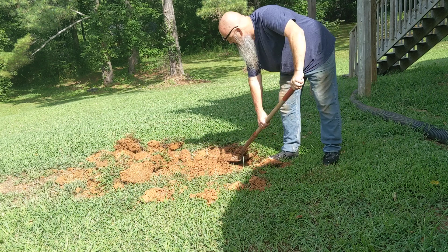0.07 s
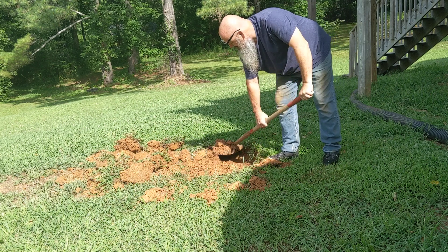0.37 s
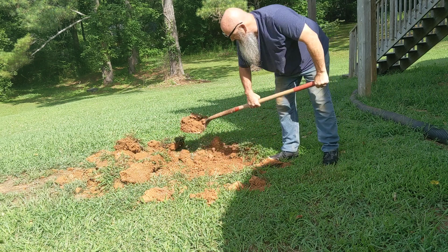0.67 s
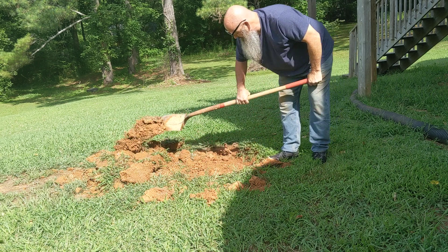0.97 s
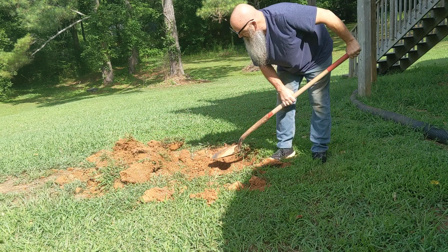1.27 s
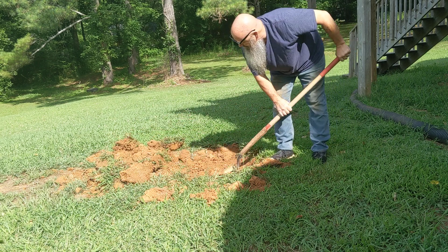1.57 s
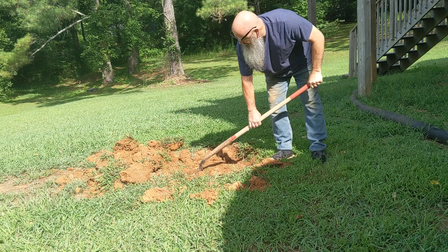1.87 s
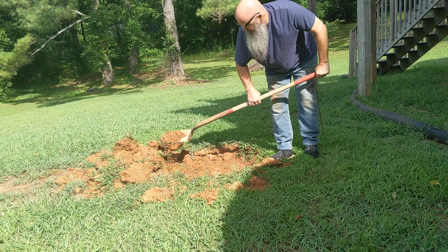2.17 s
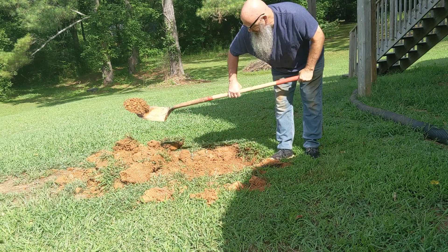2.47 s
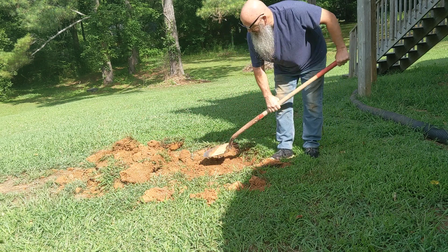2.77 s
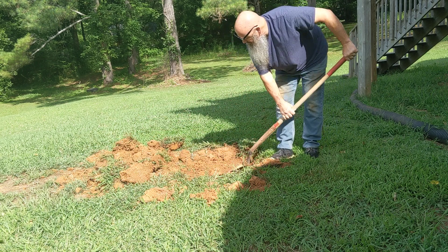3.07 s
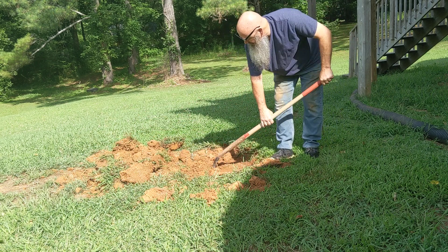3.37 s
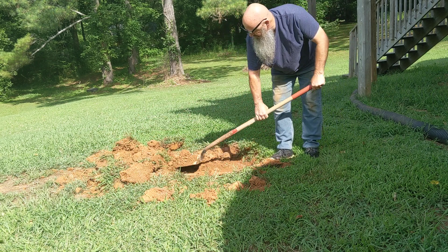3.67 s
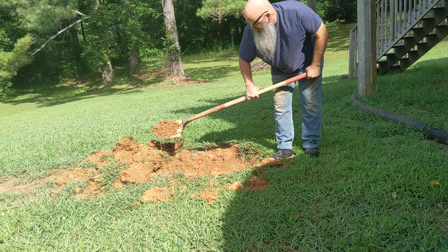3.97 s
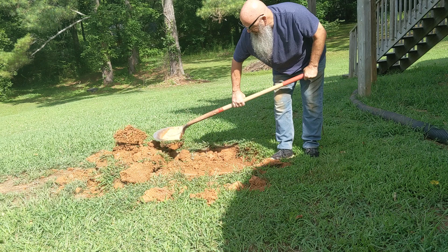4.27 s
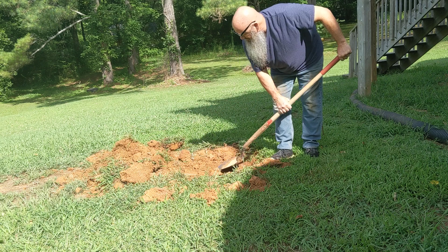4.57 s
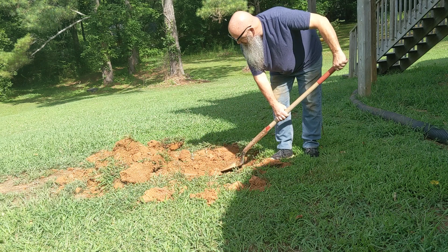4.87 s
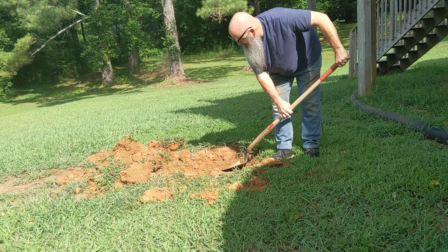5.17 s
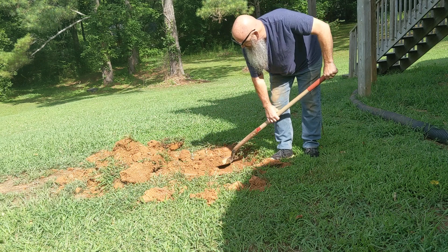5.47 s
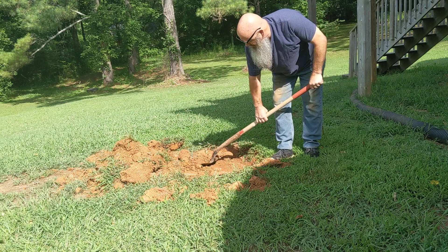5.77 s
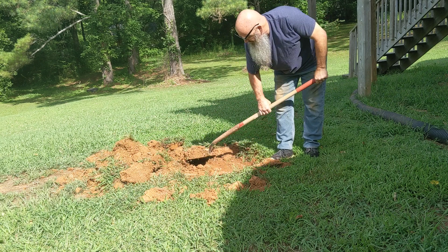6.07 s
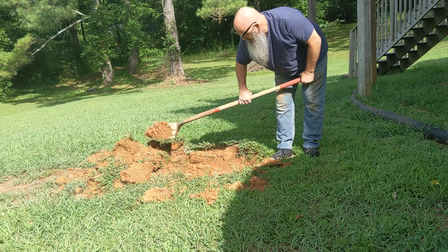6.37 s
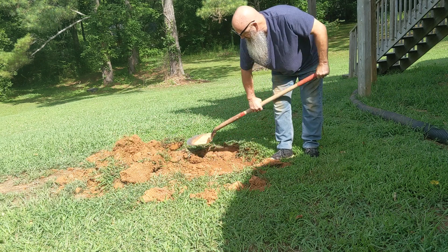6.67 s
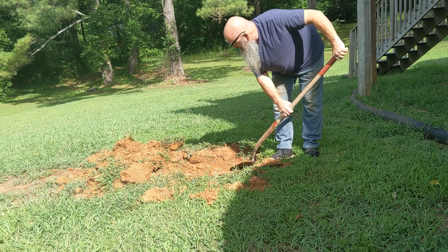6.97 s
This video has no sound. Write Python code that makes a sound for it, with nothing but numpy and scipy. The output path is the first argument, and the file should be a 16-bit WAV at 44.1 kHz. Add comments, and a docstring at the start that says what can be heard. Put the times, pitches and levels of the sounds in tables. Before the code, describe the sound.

A steel shovel digs into clay soil a few metres away on a lawn, with a slight scatter of sound off a nearby wall. It opens with a strong crunching scrape and three quick thuds. A light knock and ping come at about 1 second, then a swelling scrape with dull knocks from 1.6 to 1.9. A longer gritty stroke runs from 3.1 to 3.6, catching a stone. Cicadas hiss softly from the start and stop at about 3.7 seconds. At 4.7 the blade knocks and rings lightly, then hits a stone sharply at 4.9, the loudest moment. Scraping with several stony clicks follows from 5.3 to 5.8. Faint birds call between 5.9 and 7 seconds, and a last short scrape and knock come at about 7.2. A quiet low rumble and distant motor hum lie underneath throughout.

```python
"""A steel shovel scrapes and thuds into clay soil, a few metres away on a summer lawn beside a house.
Each stroke drags the blade through clods and grit, which set it ringing; it catches on stones
and strikes one hard. Ground and wall scatter the sound. Behind it, cicadas hiss in the trees
and stop halfway; faint birds follow, over a low outdoor rumble and the hum of a distant motor."""
import sys
import numpy as np
from scipy import signal
from scipy.fft import rfft, irfft, next_fast_len
from scipy.io import wavfile

SR = 44100
rng = np.random.default_rng(int(sys.argv[2]) if len(sys.argv) > 2 else 0)


def put_to_file(sound):
    """Save the sound as 16-bit audio at rate SR, in the file named by the first command-line argument."""
    columns = np.atleast_2d(sound).T  # one column per channel
    safe = np.clip(columns, -1, 1)
    whole_steps = np.round(safe * 32767)
    wavfile.write(sys.argv[1], SR, whole_steps.astype(np.int16))


N = 317961
TIME = np.arange(N) / SR
RING_TIME = np.arange(SR // 3) / SR


def from_db(db):
    """Decibels to gain."""
    return 10 ** (np.asarray(db) / 20)


def unit_rms(x):
    """Scale to rms 1."""
    return x / np.sqrt(np.mean(x ** 2) + 1e-20)


def pan(db):
    """Gains of the two ears for a left-minus-right level."""
    return from_db(db * np.array([[.5], [-.5]]))


def at_hz(points, hz):
    """Read a frequency curve on a log axis."""
    corners_hz, values = np.transpose(points)
    return np.interp(np.log(hz + 1e-3), np.log(corners_hz), values)


def band(x, low_hz, high_hz, order=2):
    """Causal band-pass."""
    sos = signal.butter(order, [low_hz, min(high_hz, .48 * SR)], "band", fs=SR, output="sos")
    return signal.sosfilt(sos, x)


def resonance(x, hz, width_hz):
    """One ringing mode, gain 1 at its peak."""
    return signal.lfilter(*signal.iirpeak(hz, hz / width_hz, fs=SR), x)


def sine(hz):
    """An oscillator that follows a pitch curve."""
    return np.sin(2 * np.pi * np.cumsum(hz) / SR)


def drift(per_s):
    """Smooth random modulation, rms 1."""
    knots = rng.standard_normal(8192)
    return unit_rms(np.interp(TIME * per_s, np.arange(len(knots)), knots))


def grains(per_s, spread_db):
    """Random clicks of very uneven size, rms 1."""
    sizes = from_db(spread_db * np.minimum(rng.exponential(1, N), 4)) * rng.choice([-1, 1], N)
    return unit_rms(sizes * (rng.random(N) < per_s / SR))


def rough_tones(notes):
    """For each note, a swell of noise feeds one resonance, which then rings out."""
    out = np.zeros(N + len(RING_TIME))
    for start_s, length_s, hz, width_hz, level_db in notes:
        swell = np.sqrt(np.sin(np.pi * np.minimum(RING_TIME / length_s, 1)).clip(0))
        rub = swell * rng.standard_normal(len(RING_TIME))
        tone = resonance(resonance(rub, hz, width_hz), hz, 4 * width_hz)
        at = round(start_s * SR)
        out[at:at + len(tone)] += from_db(level_db) * np.sqrt(length_s * SR) * tone / np.linalg.norm(tone)
    return out[:N]


# how alike the ambience is at the two ears: (frequency [Hz], correlation [0..1])
EAR_LIKENESS = [(50, 1), (250, 0.7), (1000, 0.41), (2500, 0.055), (4500, 0), (16000, 0.11)]
def outdoor_noise(spectrum):
    """Noise from all around, centred in the bass and wide in the treble; the mid has rms 1."""
    size = next_fast_len(N)
    mid, side = rfft(rng.standard_normal((2, size)))
    hz = np.fft.rfftfreq(size, 1 / SR)
    alike = at_hz(EAR_LIKENESS, hz)
    ears = np.sqrt(1 + alike) * mid + np.sqrt(1 - alike) * side * [[1], [-1]]
    noise = irfft(from_db(at_hz(spectrum, hz)) * ears)[:, :N]
    return noise / np.std(noise.mean(0))


# tone of the outdoor bed: (frequency [Hz], relative density [dB])
AIR_SPECTRUM = [(20, -2.5), (45, -1.5), (70, -2), (115, -4), (160, -9), (220, -14.5), (300, -25),
                (800, -21), (1300, -23.5), (2100, -27.5), (3200, -23), (4300, -24), (5400, -20.5),
                (6500, -29), (8200, -36.5), (16000, -39.5)]
def outdoor_air(level_db=-56.4):
    """A steady bed of low rumble and far insect hiss."""
    return from_db(level_db) * outdoor_noise(AIR_SPECTRUM) * pan(-1)


# partials of the motor: (frequency [Hz], level before trim [dB])
MOTOR_PARTIALS = [(48, -65), (118, -65.5)]
def motor_hum(trim_db=-3, waver_db=3.5, wander_hz=1.497):
    """A distant motor hums, wavering in level and pitch."""
    hum = sum(from_db(level_db + waver_db * drift(5)) * sine(hz + wander_hz * drift(9.8))
              for hz, level_db in MOTOR_PARTIALS)
    return from_db(trim_db) * np.sqrt(2) * hum * pan(-1)


# tone of the cicada chorus: (frequency [Hz], relative density [dB])
CICADA_SPECTRUM = [(2500, -23), (3500, -12), (4400, -4.5), (5500, -4), (6300, -6), (7200, -3.5),
                   (8200, -12.5), (9300, -11), (10500, -27), (11800, -16.5), (13000, -28), (16000, -24.5)]
def cicadas(start_db=-56.5, far_db=-75, sag_db_per_s=0.8, stop_s=3.7, stop_db_per_s=179, pulse_hz=49):
    """Cicadas hiss with a faint fast pulse, tire slowly, then stop; a few go on far away."""
    pulse = 1 + 0.088 * sine(pulse_hz + 2 * drift(5.15))
    chorus_db = start_db - sag_db_per_s * TIME - stop_db_per_s * np.maximum(TIME - stop_s, 0)
    shimmer_db = 0.7 * drift(36.4)
    level = from_db(np.maximum(chorus_db, far_db) + shimmer_db)
    return level * pulse * outdoor_noise(CICADA_SPECTRUM) * pan(-1)


# distant calls: (time [s], length [s], pitch [Hz], bandwidth [Hz], level [dB])
FAR_BIRD_CALLS = [(5.88, 0.17, 3100, 250, -66.5), (6.67, .25, 4520, 120, -63), (6.72, 0.4, 3720, 1260, -64)]
def far_birds():
    """Calls blurred by the trees reach each ear differently."""
    return np.array([rough_tones(FAR_BIRD_CALLS) for _ in range(2)])


def small_bird(start_s=6.438, from_hz=5400, to_hz=7250, glide_s=.012, rasp_hz=420,
               level_db=-61, attack_s=.016, fade_db_per_s=61):
    """A thin lisp slurs up to a held, buzzy pitch and fades."""
    since = np.maximum(TIME - start_s, 0)
    pitch = to_hz + (from_hz - to_hz) * np.exp(-since / glide_s) + rasp_hz * drift(900)
    envelope = np.minimum(since / attack_s, 1) * from_db(level_db - fade_db_per_s * since)
    return envelope * sine(pitch)


# shaft and blade modes, damped by the soil: (frequency [Hz], bandwidth [Hz], relative level [dB])
SHOVEL_MODES = [(227.5, 28, 2), (313, 12, 2.5), (390, 64, -3.5), (557.3, 12.7, 6), (631, 27, -8.5),
                (720, 47, -3.5), (806, 39, 7.5), (1135, 170, 1.5), (1370, 28, -3), (1555, 110, -1.5),
                (1700, 18, 6.5), (2000, 22, -2), (2260, 180, 0.5), (2470, 140, -5), (2860, 29, -2),
                (3100, 170, 6), (4150, 680, -1.5), (5200, 590, -1.5), (5710, 750, -2.5), (7430, 660, -1.5),
                (9280, 850, 4), (11480, 190, 3), (13300, 690, -9)]
# scatter off ground and wall: (frequency [Hz], level against the direct sound [dB])
WALL_SCATTER = [(150, -18), (800, -16), (1500, -13), (3200, -4), (4500, 2), (16000, 4)]
# the shovel's place in the stereo image: (frequency [Hz], left minus right [dB])
SHOVEL_PAN = [(200, -2.5), (700, -3.5), (1500, 2), (2500, -4.5), (3400, 6), (5000, -9.5), (6500, -5.5),
              (10000, -9), (13000, -3.5), (16000, -5)]
# phase between the ears: (frequency [Hz], left lead [rad])
SHOVEL_PHASE = [(400, 0.46), (1500, 0.43), (3000, -1.4), (4000, -1.5), (11000, 0.1), (14000, -7.7)]
def shovel_response(click_db=-13, near_t60_s=.06, far_t60_s=.36, far_db=-10):
    """One grain on the blade at both ears: a click, the modes, then scatter from ground and wall."""
    size = len(RING_TIME)
    ring = from_db(click_db) * (RING_TIME == 0)
    for hz, width_hz, level_db in SHOVEL_MODES:
        decay = np.pi * width_hz
        mode = np.exp(-decay * RING_TIME) * np.cos(2 * np.pi * hz * RING_TIME)
        ring += from_db(level_db) * 2 * decay / SR * mode
    ring = np.roll(ring, 24)   # a short delay leaves room for one ear to lead
    bins_hz = np.fft.rfftfreq(size, 1 / SR)
    tail = from_db(-60 * RING_TIME / near_t60_s) + from_db(far_db - 60 * RING_TIME / far_t60_s)
    scatter_gain = from_db(at_hz(WALL_SCATTER, bins_hz))
    wash = irfft(rfft(rng.standard_normal((2, size))) * scatter_gain, size)
    scatter = wash * tail / np.linalg.norm(tail)
    paths = (1 + rfft(scatter)) / np.hypot(1, scatter_gain)
    ear_gain = pan(at_hz(SHOVEL_PAN, bins_hz))
    ear_phase = np.exp(1j * at_hz(SHOVEL_PHASE, bins_hz) * [[.5], [-.5]])
    fade_out = np.minimum(10 * (1 - RING_TIME / RING_TIME[-1]), 1) ** 2
    return fade_out * irfft(rfft(ring) * paths * ear_gain * ear_phase, size)


def play_through(force, response):
    """Drive a response, scaled so that its mid has unit energy."""
    response = response / np.linalg.norm(response.mean(0))
    return signal.oaconvolve(np.atleast_2d(force), response, axes=1)[:, :N]


def widen(mid, side, above_hz=3500, side_db=-2):
    """Grains land all over the blade, so its treble differs between the ears."""
    return mid + from_db(side_db) * band(side, above_hz, SR) * [[1], [-1]]


# light rings of the steel: (time [s], level [dB])
BLADE_PINGS = [(1.062, -53), (4.055, -60), (4.765, -49)]
def blade_pings(length_s=.0064, hz=1696, width_hz=32):
    """The free blade pings in one narrow mode."""
    return rough_tones([(start_s, length_s, hz, width_hz, db) for start_s, db in BLADE_PINGS])


# shovel modes under load: (frequency [Hz], bandwidth [Hz], level against the load [dB])
RUBBED_MODES = [(215, 125, -15), (799, 120, -10.5), (1710, 90, -15.5)]
def loaded_ring(load, waver_db=4, ring_out_db_per_s=130):
    """The earth's weight rubs a few modes unevenly; they ring on when the blade comes free."""
    fall_db = ring_out_db_per_s * TIME
    held_db = np.maximum.accumulate(20 * np.log10(load + 1e-9) + fall_db) - fall_db
    out = np.zeros(N)
    for hz, width_hz, level_db in RUBBED_MODES:
        ring = resonance(resonance(rng.standard_normal(N), hz, 4 * width_hz), hz, width_hz)
        out += from_db(held_db + level_db) * unit_rms(ring * from_db(waver_db * drift(22)))
    return out


def push_force(length_s, level_db, swell_db, bite_s=.009, stop_db_per_s=515,
               trickle_db=-15, trickle_db_per_s=113):
    """One push bites, swells or eases, and stops quickly; loose crumbs trickle on."""
    since = np.arange(SR) / SR
    after = np.maximum(since - length_s, 0)
    attack = np.minimum(since / bite_s, 1)
    body = from_db(level_db + swell_db * np.minimum(since / length_s, 1))
    release = np.maximum(from_db(-stop_db_per_s * after), from_db(trickle_db - trickle_db_per_s * after))
    return attack * body * release


# pushes through the soil: (time [s], length [s], force [dB], swell over the push [dB],
# clod offset [dB], grit offset [dB], singing mode [Hz])
BLADE_PUSHES = [(0.062, 0.11, -38.5, -2.5, -0.5, 3.5, 804), (0.16, 0.034, -34, -4, 3.5, 0.5, 400),
                (0.206, 0.027, -41, 0, -2, -9, 2470), (1.584, 0.14, -50, 9.5, -3, 1, 730),
                (1.732, 0.12, -36.5, 0, -1.5, -5, 1370), (1.863, 0.043, -51, -6, -8, -8, 1710),
                (3.086, 0.072, -54.5, -6.5, 0, 7, 3100), (3.161, 0.12, -49.5, 7.5, -4, 3, 3100),
                (3.279, 0.25, -45.5, -4.5, -6.5, 0, 213), (3.45, 0.089, -40, -1, -10.5, -1, 1370),
                (3.532, 0.072, -44, -3.5, -3, -1, 2260), (4.825, 0.11, -50.5, -0.5, -6.5, 3, 2860),
                (4.931, 0.052, -39.5, -9.5, -4, -21, 1005), (5.324, 0.14, -48, 1, -2.5, 1, 3140),
                (5.502, 0.053, -47, -6.5, -6, 6.5, 2330), (5.574, 0.094, -47, -4, -4.5, 0, 3070),
                (5.697, 0.054, -48, 0, -0.5, 0.5, 2360), (7.16, 0.094, -47, -7, -5.5, 4, 1370)]
def soil_forces():
    """The pushes add in power to three envelopes: the force on clods, sand and grit."""
    power = np.zeros((3, N + SR))
    for start_s, length_s, level_db, swell_db, clods_db, grit_db, _ in BLADE_PUSHES:
        shares = from_db([[clods_db], [0], [grit_db]])
        at = round(start_s * SR)
        power[:, at:at + SR] += (shares * push_force(length_s, level_db, swell_db)) ** 2
    return np.sqrt(power[:, :N])


def blade_singing(offset_db=-6, q=12):
    """Friction makes one mode sing in each push."""
    return rough_tones([(start_s, length_s, hz, hz / q, level_db + swell_db / 2 + offset_db)
                        for start_s, length_s, level_db, swell_db, _, _, hz in BLADE_PUSHES])


def soil_scrape(response, clod_force, sand_force, grit_force, judder_db=3):
    """Clods pop, sand rasps and grit ticks, juddering as the blade sticks and slips; pebbles crack."""
    judder = unit_rms(from_db(judder_db * drift(170)))
    sand = sand_force * judder * widen(grains(3600, 3.5), grains(3600, 3.5))
    grit = grit_force * judder * widen(grains(5000, 4.5), grains(5000, 4.5))
    pebbles = np.sqrt(sand_force * grit_force) * grains(per_s=70, spread_db=3.4)
    clods = clod_force * judder * grains(1200, 3.5)
    return (from_db(-1.5) * play_through(clods, band(response, 202, 775, order=3))
            + from_db(-1) * play_through(sand, band(response, 1300, 3850))
            + from_db(-4) * play_through(grit, band(response, 3500, 21000))
            + from_db(-6) * play_through(pebbles, response))


def blow(response, start_s, level_db, length_s, mode_hz, boost_db, low_hz, high_hz, q=12):
    """A blow crushes a quick run of grains; the spot it lands on favours one mode."""
    body = band(response, low_hz, high_hz, order=1)
    body = body + from_db(boost_db) * resonance(body, mode_hz, mode_hz / q)
    envelope = (1 - np.exp(-RING_TIME / .0005)) * np.exp(-RING_TIME / length_s)
    crush = widen(*rng.standard_normal((2, len(RING_TIME))))
    hit = signal.fftconvolve(crush * envelope, body, axes=1)
    hit *= from_db(level_db) * np.sqrt(length_s * SR) / np.linalg.norm(hit.mean(0))
    return np.pad(hit, ((0, 0), (round(start_s * SR), N)))[:, :N]


# hits on earth: (time [s], level [dB], brightness [Hz], favoured mode [Hz])
EARTH_THUDS = [(0.073, -34, 3900, 840), (0.172, -28, 910, 395), (0.227, -31.5, 3450, 763),
               (0.971, -46.5, 2200, 1940), (1.591, -53, 3000, 790), (1.737, -36.5, 3000, 750),
               (1.878, -37.5, 2000, 854), (3.353, -43.5, 2000, 830), (4.748, -39.5, 1500, 245),
               (4.936, -36, 990, 248), (5.784, -43, 4960, 730), (7.176, -43, 5000, 1700)]
def earth_thuds(response, length_s=.0099):
    """The blade meets packed earth with a dull knock."""
    return sum(blow(response, start_s, db, length_s, mode_hz, boost_db=13.5, low_hz=166, high_hz=top_hz)
               for start_s, db, top_hz, mode_hz in EARTH_THUDS)


# hits on stone: (time [s], level [dB], crunch decay [s], favoured mode [Hz])
STONE_STRIKES = [(4.9365, -17, .0025, 2980), (4.979, -38, .004, 9400), (5.058, -54, .025, 6800),
                 (5.701, -37, .006, 1700), (3.381, -33, .009, 9400), (5.328, -39, .004, 3000),
                 (5.431, -36, .002, 3100), (5.462, -38, .005, 3200), (5.512, -42.5, .006, 5200),
                 (5.568, -31, .003, 2900), (6.133, -45.5, .002, 3200)]
def stone_strikes(response):
    """The edge catches a stone with a short, bright crunch."""
    return sum(blow(response, start_s, db, length_s, mode_hz, boost_db=10.5, low_hz=450, high_hz=11500)
               for start_s, db, length_s, mode_hz in STONE_STRIKES)


def scene():
    """The shovel up front, the summer lawn behind."""
    response = shovel_response()
    clod_force, sand_force, grit_force = soil_forces()
    scrape = soil_scrape(response, clod_force, sand_force, grit_force)
    hits = earth_thuds(response) + stone_strikes(response)
    ringing = (blade_singing() + blade_pings() + loaded_ring(clod_force)) * pan(-2)
    lawn = cicadas() + small_bird() + far_birds() + motor_hum() + outdoor_air()
    return scrape + hits + ringing + lawn


def record(dry):
    """A steep low-pass cuts the very top."""
    cutoff_hz = 15900
    return signal.sosfilt(signal.ellip(12, .1, 80, cutoff_hz, fs=SR, output="sos"), dry)


dry = scene()
out = record(dry)
put_to_file(out)
```